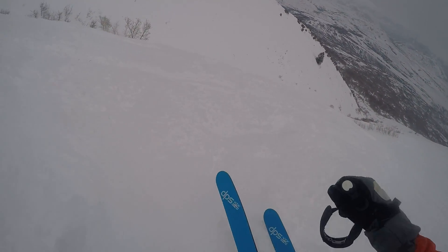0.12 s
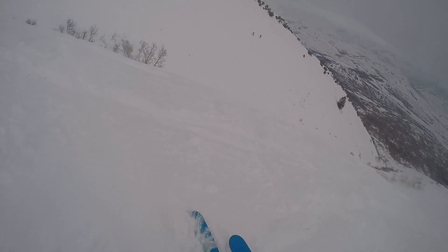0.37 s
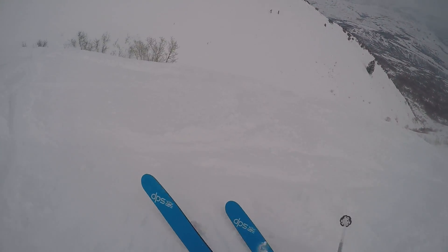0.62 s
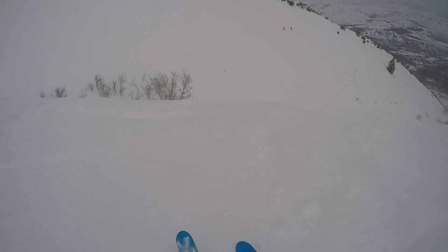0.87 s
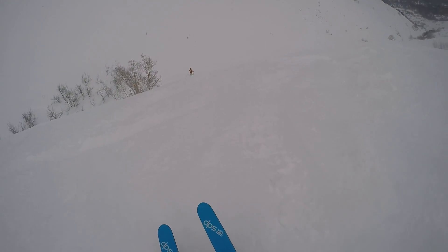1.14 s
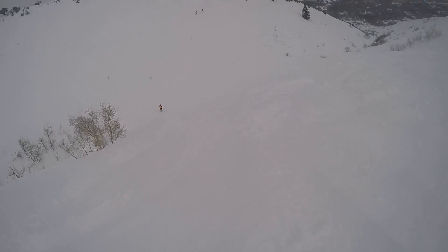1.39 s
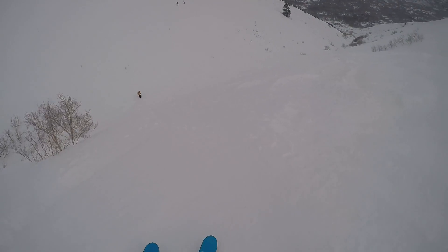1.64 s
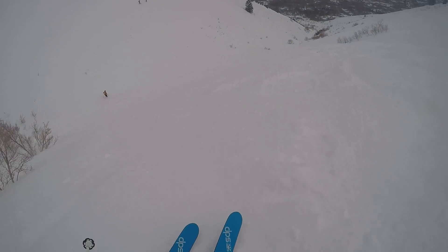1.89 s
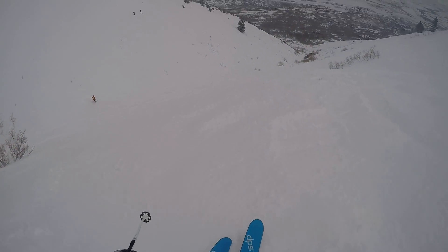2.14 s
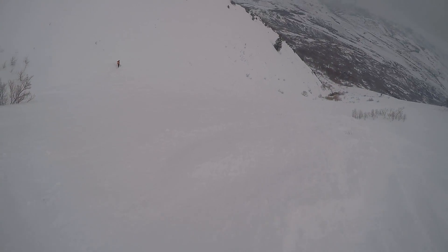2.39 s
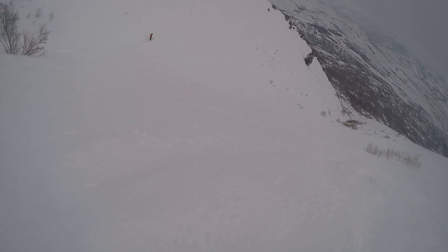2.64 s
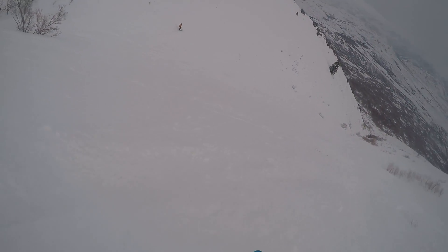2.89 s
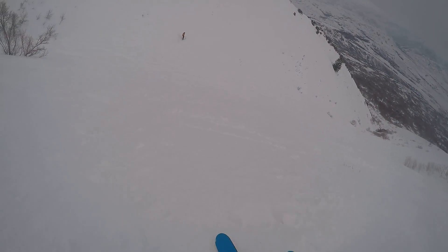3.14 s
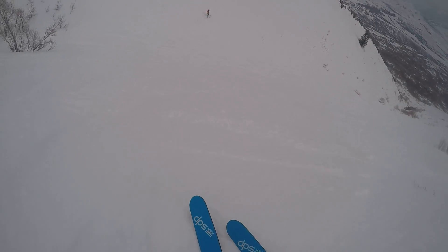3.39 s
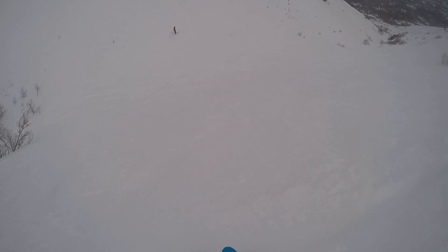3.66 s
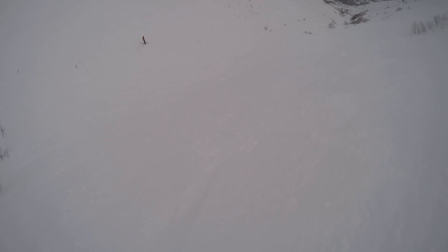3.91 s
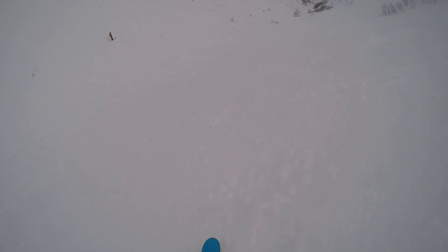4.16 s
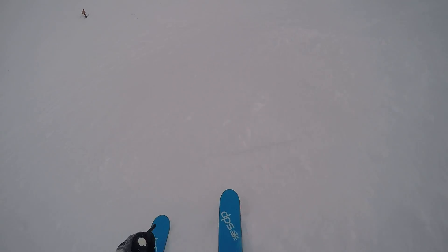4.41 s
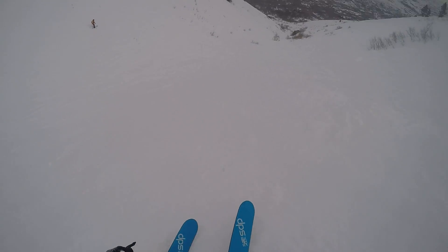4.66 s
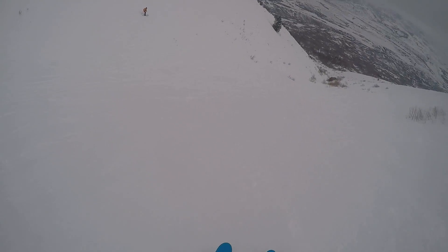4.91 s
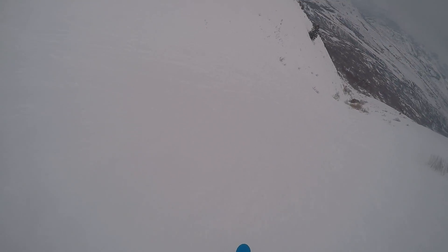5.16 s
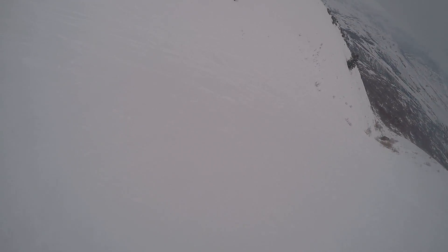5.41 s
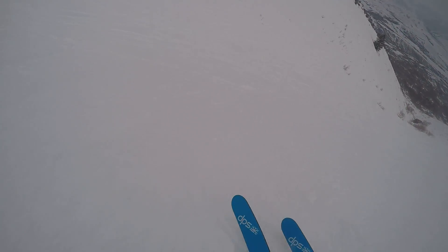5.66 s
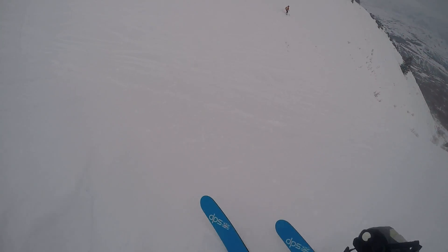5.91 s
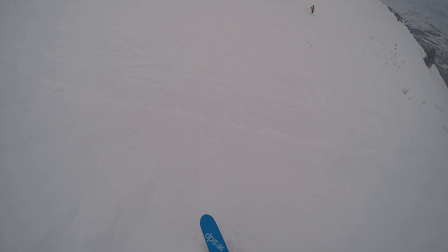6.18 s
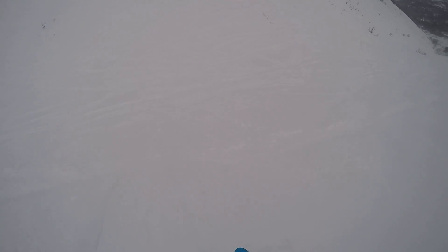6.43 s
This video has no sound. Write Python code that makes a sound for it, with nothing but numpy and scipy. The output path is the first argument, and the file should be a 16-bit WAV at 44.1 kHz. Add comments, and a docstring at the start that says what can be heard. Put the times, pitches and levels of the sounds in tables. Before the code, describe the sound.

A skier carves down an open snowy slope, heard by a microphone boxed in with a camera. Wind presses on it as low uneven rumble and hollow boom. Rushing snow hiss starts firm, drops to almost nothing, rises in two more turns, then peaks with heavier spray. Sparse ticks, short scratchy rubs, dull low jolts and clacks of the housing punctuate it, the strongest close to the end.

```python
"""Snow hiss swells and fades as a skier carves turns through powder, heard close from inside a sealed case.
The microphone shares the case with a camera: its cavities ring with grains of snow noise.
Behind that, wind heaves, booms and rushes as slowly varying resonant noise. Jolts through the mount are
short low swings of pressure, mount knocks are filtered contacts, crystals ticking on the shell are clicks
in three resonances, and gritty rubs on the case are stuttering coarse grains."""
import sys
import numpy as np
from scipy import signal
from scipy.io import wavfile
from scipy.ndimage import uniform_filter1d

SR = 44100
rng = np.random.default_rng(int(sys.argv[2]) if len(sys.argv) > 2 else 0)


def wav_record(signal):
    """Record a signal, one row per channel, as 16-bit PCM in the file named by sys.argv[1]."""
    frames = np.transpose(np.atleast_2d(signal))
    bounded = np.clip(frames, -1, 1)
    # unit amplitude maps onto the largest positive 16-bit level
    quanta = np.round(bounded * 32767).astype(np.int16)
    wavfile.write(sys.argv[1], SR, quanta)


def undo_db(level):
    """Turn decibels back into plain size, where 20 dB means ten times bigger."""
    steps = np.asarray(level, float) / 20
    return 10 ** steps


N = 288855  # samples

# Wind on the case: (t/s, slow buffeting level/dB, case boom level/dB, rush over the shell level/dB)
WIND_GUSTS = [(0.03, -25.5, -41, -54.5), (0.43, -27, -40, -44), (0.65, -35.5, -49, -54),
              (1.03, -32.5, -47, -58), (1.21, -44, -50.5, -57.5), (1.57, -42, -41.5, -54.5),
              (1.94, -32.5, -52, -58.5), (2.13, -40.5, -47, -57), (2.3, -43.5, -54, -56.5),
              (2.55, -44.5, -47.5, -54.5), (2.73, -42, -51, -55.5), (3.19, -30, -49, -53),
              (3.39, -30.5, -48.5, -53.5), (3.52, -41.5, -52.5, -56.5), (3.75, -45, -47.5, -52.5),
              (3.93, -40.5, -41.5, -53.5), (4.26, -33, -36, -44), (4.39, -28, -36, -51.5),
              (4.59, -27.5, -48, -50), (4.79, -36, -40.5, -49.5), (5.44, -36, -43.5, -47.5),
              (5.84, -27, -48, -52), (6.02, -27.5, -48, -51.5), (6.22, -31, -46.5, -50.5),
              (6.44, -36, -47, -53.5), (6.55, -48.5, -40.5, -53)]
# Resonances filled by each kind of wind noise: (f/Hz, width/Hz, relative level/dB)
BUFFET_MODES = [(19, 14, 0), (38, 16, -9)]
BOOM_MODES = [(67.6, 25, -11), (93.9, 40.6, -1.5), (141, 170, -28.5)]
RUSH_MODES = [(192.3, 105, 2.5), (311, 210, -4), (483, 133, -3), (648, 110, -2.5), (771, 124, -0.5),
              (950, 300, -7.5)]

# Crystals on the shell: (t/s, relative level/dB, brightness/0-1)
CRYSTAL_HITS = [(0.0434, -42, 0.7), (0.2663, -45, 0.65), (0.2834, -38, 0.7), (0.301, -39, 0.6),
                (0.3584, -46, 0.6), (0.5294, -32, 1), (1.1188, -40, 0.55), (1.1308, -28.5, 0.8),
                (1.3122, -47, 0.3), (1.3867, -40, 0.9), (1.5758, -46, 0.5), (1.6666, -31.5, 1),
                (1.7185, -52, 0.7), (2.09, -40, 1), (2.3944, -52, 0.9), (2.538, -30, 0.77),
                (2.576, -29.5, 0.97), (2.6688, -44, 0.7), (2.8524, -45, 0.7), (3.473, -44, 0.9),
                (3.6387, -40, 0.7), (3.7818, -34.5, 0.8), (4.3816, -26.5, 0.1)]
# Shell resonances, low to high: (f/Hz, width/Hz)
SHELL_MODES = [(4400, 430), (7000, 3600), (12000, 6500)]

# Gritty rubs against the case: (t/s, length/s, level/dB, brightness/0-1)
CASE_RUBS = [(1.159, 0.039, -46, 0.87), (1.367, 0.028, -39.5, 0.16), (1.409, .03, -45, 0.1),
             (1.653, 0.056, -39, 0.2), (1.695, 0.011, -41, 0.54), (1.707, 0.03, -31.5, 0.43),
             (1.788, 0.038, -39.5, 0.85), (4.005, 0.1, -32, 0.08), (4.112, 0.066, -36.5, 0.12),
             (4.312, 0.08, -31.5, 0.05), (4.43, 0.086, -41, 0.16), (4.864, 0.028, -32.5, 0.04),
             (5.473, 0.062, -36.5, 0.46), (5.765, 0.054, -32.5, 0.24), (5.886, 0.017, -29, 0.35)]
# Cavities rung by dull and by bright rubs: (f/Hz, width/Hz, relative level/dB)
DULL_RUB_MODES = [(1668, 420, 7), (716, 270, -13)]
BRIGHT_RUB_MODES = [(2630, 1160, 3.5), (3390, 450, 6), (4430, 410, 1.5)]

# Knocks of the mount: (t/s, contact peak level/dB, f/Hz, case body relative level/dB)
KNOCKS = [(0.9946, -19, 1860, -3.5), (1.7045, -25, 1690, -7), (1.7214, -24.5, 1580, 1),
          (1.73, -17, 1850, -5), (2.0612, -23, 1810, 2), (4.359, -20.5, 1690, -1), (4.3829, -22, 1760, -14),
          (4.6369, -15.5, 1810, -6), (4.8903, -19.5, 1750, -42), (5.9237, -11, 1730, -4)]
# Ringing of the case body behind each knock: (f/Hz, relative level/dB, time to fall by 60 dB/s)
BODY_MODES = [(473, -27, 0.0067), (813, -26.5, 0.022), (1780, -14.5, 0.026)]

# Jolts through the mount: (t/s, peak level/dB, f/Hz, length/s, push 1 or pull -1)
MOUNT_JOLTS = [(1.085, -17, 21, .035, 1), (2.457, -31, 95, .012, 1), (3.27, -20, 22, .035, 1),
               (4.217, -15, 40, .022, -1), (4.335, -16, 20, .03, 1), (4.434, -19, 22, .025, -1),
               (4.695, -19, 25, .02, -1), (5.058, -25, 45, .03, 1), (5.897, -11, 20, .011, 1),
               (5.912, -9, 20, .012, -1), (5.906, -25, 170, .004, -1), (5.912, -16, 98, .013, 1),
               (5.951, -10, 19, .03, 1)]

# The turns: (t/s, edge pressure as carving hiss level/dB, spray level/dB, airborne fine powder level/dB)
SKI_TURNS = [(0.0, -40.5, -43.5, -54), (.22, -39.5, -46, -57.5), (.4, -35.5, -39, -53),
             (.52, -37.5, -46, -52), (.62, -46, -54, -59), (.76, -48, -56, -61), (.85, -45, -52.5, -63),
             (1.08, -52, -58.5, -64), (1.22, -52, -58, -80), (1.6, -47, -55.5, -65.5),
             (1.95, -50.5, -56, -67), (2.4, -50, -58.5, -68.5), (2.68, -42, -49.5, -60.5),
             (2.95, -39, -47, -55.5), (3.3, -40, -44, -62), (3.48, -50.5, -55.5, -68.5),
             (3.92, -43, -51.5, -66.5), (4.06, -39.5, -46, -60.5), (4.2, -36, -43.5, -51),
             (4.38, -39, -46, -58.5), (4.56, -41.5, -52.5, -65), (4.88, -41.5, -49, -63),
             (4.98, -37, -44, -52.5), (5.17, -37.5, -41, -53.5), (5.38, -35, -33, -50.5),
             (5.45, -33, -38.5, -46.5), (5.62, -33, -36, -46), (5.78, -39, -44.5, -68),
             (5.9, -35.5, -37.5, -50.5), (6.08, -42.5, -48.5, -56.5), (6.22, -37.5, -45, -54.5),
             (6.38, -44.5, -52.5, -61), (6.55, -42.5, -51.5, -64)]
# Puffs of powder past the case: (t/s, length/s, level/dB)
POWDER_PUFFS = [(0.31, 0.07, -62), (0.527, 0.013, -63), (0.915, 0.016, -57.5), (3.976, 0.064, -68),
                (5.39, 0.034, -56), (5.515, 0.13, -63)]
# Case cavities rung by each kind of snow hiss: (f/Hz, width/Hz, relative level/dB)
SCRAPE_MODES = [(1650, 724, -15.5), (1860, 640, -15.5)]
CARVE_MODES = [(2276, 560, -5.5), (2946, 386, -3.5), (3132, 450, -6)]
SPRAY_MODES = [(3920, 1000, -4), (4570, 220, -16.5)]
DUST_MODES = [(5440, 690, 3.5), (6330, 1900, -5), (7660, 1080, -7)]
MIST_MODES = [(9380, 2200, -2), (12700, 4300, -10.5)]
# Levels led by two controls: (level/dB at their means, share of first swing, share of second swing)
SCRAPE_FOLLOWS = (-46, 0.52, 0.05)  # edge pressure, spray
MIST_FOLLOWS = (-66, 0.099, 0.73)  # edge pressure, powder


def rms_one(x):
    """Scale to unit power."""
    return x / np.sqrt(np.mean(x ** 2) + 1e-20)


def in_time(rows):
    """Join the rows by straight lines over time, giving one curve per column after the first."""
    s, *columns = np.transpose(rows)
    return [np.interp(np.arange(N) / SR, s, column) for column in columns]


def follow(law, first, second):
    """A level in dB that follows the swings of two controls about their means."""
    level_db, share_first, share_second = law
    return level_db + share_first * (first - first.mean()) + share_second * (second - second.mean())


def drift(corner_hz):
    """Slow chance with spread 1: noise through two equal low-pass poles."""
    # drawn at every 40th sample, and joined by straight lines
    r = np.exp(-80 * np.pi * corner_hz / SR)
    noise = rng.standard_normal(N // 40 + 2002)
    slow = signal.lfilter([1], [1, -2 * r, r * r], noise)[2000:]
    return np.interp(np.arange(N) / 40, np.arange(len(slow)), rms_one(slow))


def resonate(x, hz, width_hz):
    """Two equal resonators in a row: a peak with steep skirts."""
    r, w = np.exp(-np.pi * width_hz / SR), 2 * np.pi * hz / SR
    section = [(1 - r * r) / 2, 0, -(1 - r * r) / 2, 1, -2 * r * np.cos(w), r * r]
    return signal.sosfilt([section, section], x)


def ring(clicks, hz, t60):
    """A unit click sets a sine ringing from height 1, falling by 60 dB in t60 seconds."""
    r, w = undo_db(-60 / (t60 * SR)), 2 * np.pi * hz / SR
    return signal.lfilter([0, np.sin(w)], [1, -2 * r * np.cos(w), r * r], clicks + 1e-18)


def hiss(modes, flutter, grain_db, patchy_db, shared_db):
    """Grains of uneven size ring in each resonance; all flutter together, each also on its own."""
    out = 0
    for hz, width_hz, level_db in modes:
        size_db = grain_db * np.minimum(rng.exponential(1, N + SR), 6)
        grains = rng.standard_normal(N + SR) * undo_db(size_db)
        sound = resonate(grains, hz, width_hz)[SR:]  # the first second settles the resonance
        out = out + sound * undo_db(level_db + patchy_db * drift(2.3) + shared_db * flutter)
    return rms_one(out)


def wind():
    """Eddies press on the case: slow heaves, a hollow boom and a thin rush."""
    buffet_db, boom_db, rush_db = in_time(WIND_GUSTS)
    gust = drift(2.26)
    heave = hiss(BUFFET_MODES, gust, grain_db=0, patchy_db=1, shared_db=1)
    # eddies come at more even strength
    local_power = uniform_filter1d(heave ** 2, size=SR // 8)
    heave = rms_one(heave / (local_power + .05) ** .4)
    boom = hiss(BOOM_MODES, gust, grain_db=3, patchy_db=1.0, shared_db=-0.63)
    rush = hiss(RUSH_MODES, gust, grain_db=4.5, patchy_db=1.83, shared_db=1.28)
    return undo_db(buffet_db) * heave + undo_db(boom_db) * boom + undo_db(rush_db) * rush


def ticks():
    """Hard crystals are bare clicks in three shell resonances; fainter ones fall at random."""
    clicks = np.zeros((3, N)) + 1e-18
    mode_brightness = np.array([0, .5, 1])
    for s, level_db, brightness in CRYSTAL_HITS:
        clicks[:, round(s * SR)] = undo_db(level_db - 25.0 * (brightness - mode_brightness) ** 2)
    # about six a second in each of the two upper resonances
    falls = rng.random((2, N)) < 6 / SR
    clicks[1:] += falls * undo_db(-56 + 3.0 * np.minimum(rng.exponential(1, (2, N)), 3))
    out = np.zeros(N)
    for mode_clicks, (hz, width_hz) in zip(clicks, SHELL_MODES):
        out += 30600.0 / width_hz * resonate(mode_clicks, hz, width_hz)
    return out


def rubs():
    """Stick and slip: stuttering coarse grains; dull rubs ring lower cavities, bright ones upper ones."""
    t, stutter, out = np.arange(N) / SR, drift(103.0), np.zeros(N)
    dull = hiss(DULL_RUB_MODES, stutter, grain_db=3.0, patchy_db=-3.5, shared_db=-1.0)
    bright = hiss(BRIGHT_RUB_MODES, stutter, grain_db=11.0, patchy_db=-3.0, shared_db=2.5)
    for s, length, level_db, brightness in CASE_RUBS:
        rise = (t - s) / 0.011
        fall = (s + length - t) / 0.015 + 1
        stroke = np.clip(np.minimum(rise, fall), 0, 1)
        share = np.clip(brightness, 0, 1)
        out += undo_db(level_db) * stroke * (np.sqrt(1 - share) * dull + np.sqrt(share) * bright)
    return out


def knocks():
    """A plastic contact rings briefly at its own pitch, with the case body behind it."""
    out, contact = np.zeros(N), np.zeros(SR // 10)
    contact[:7] = np.hanning(7)
    body = sum(undo_db(db) * ring(contact, hz, t60) for hz, db, t60 in BODY_MODES)
    high_pass = signal.butter(2, 500, "high", fs=SR, output="sos")  # Hz
    thin = signal.sosfilt(high_pass, contact)
    for s, peak_db, hz, body_db in KNOCKS:
        snap = resonate(thin, hz, width_hz=640)
        knock = snap / snap.max() + undo_db(body_db) * body
        out[round(s * SR):][:len(snap)] += undo_db(peak_db) * knock
    return out


def jolts():
    """Each jolt is a swing of pressure with rebounds on either side, under a bell-shaped envelope."""
    out, t = np.zeros(N), np.arange(N) / SR
    for s, peak_db, hz, length, push in MOUNT_JOLTS:
        near = slice(int((s - .2) * SR), int((s + .2) * SR))
        lag = t[near] - s
        bell = np.exp(-(lag / length) ** 2)
        out[near] += np.sign(push) * undo_db(peak_db) * bell * np.cos(2 * np.pi * hz * lag)
    return out


def snow():
    """Five kinds of snow noise swell with the turns, roughened together by the bumps under the skis."""
    carve_db, spray_db, powder_db = in_time(SKI_TURNS)
    t = np.arange(N) / SR
    puffs = sum(undo_db(db) * np.exp(-((t - s) / length) ** 2) for s, length, db in POWDER_PUFFS)
    scrape_db = follow(SCRAPE_FOLLOWS, carve_db, spray_db)
    mist_db = follow(MIST_FOLLOWS, carve_db, powder_db)
    bumps = 0.089 * drift(15.0) + .5 * drift(27.0)
    scrape = hiss(SCRAPE_MODES, bumps, grain_db=1.5, patchy_db=2.75, shared_db=0.2)
    carve = hiss(CARVE_MODES, bumps, grain_db=2.5, patchy_db=.6, shared_db=1.6)
    spray = hiss(SPRAY_MODES, bumps, grain_db=2.5, patchy_db=1.1, shared_db=1.7)
    dust = hiss(DUST_MODES, bumps, grain_db=3.5, patchy_db=1.1, shared_db=1.5)
    mist = hiss(MIST_MODES, bumps, grain_db=2.0, patchy_db=1.0, shared_db=0.8)
    ground = undo_db(scrape_db) * scrape + undo_db(carve_db) * carve + undo_db(spray_db) * spray
    # puffs reach the mist 6.5 dB weaker than the dust
    airborne = (undo_db(powder_db) + puffs) * dust + (undo_db(mist_db) + undo_db(-6.5) * puffs) * mist
    return ground + airborne


def scene():
    """All sources meet at the one microphone inside the case."""
    return (wind() + ticks() + rubs() + knocks() + jolts() + snow())[None]


def top_cut(x):
    """Nothing passes above the cut-off."""
    return signal.sosfilt(signal.butter(12, 15400, fs=SR, output="sos"), x)


def record(dry):
    """The microphone adds its own hiss, white noise dulled by a low-pass."""
    low_pass = signal.butter(2, 9100, fs=SR, output="sos")  # Hz
    mic_hiss = signal.sosfilt(low_pass, rng.standard_normal(dry.shape))
    mix = dry + undo_db(-63.5) * mic_hiss  # dB, of the noise ahead of the low-pass
    return top_cut(mix)


dry = scene()
out = record(dry)
wav_record(out)
```